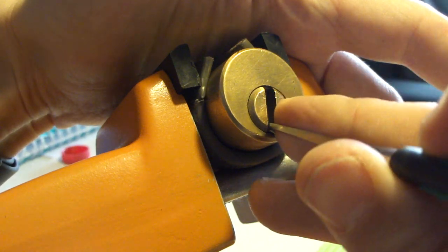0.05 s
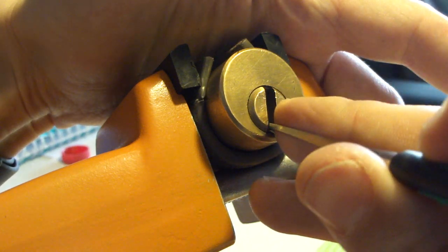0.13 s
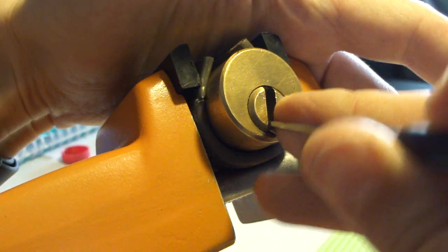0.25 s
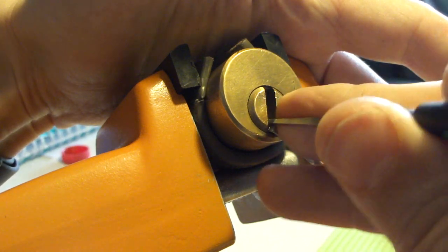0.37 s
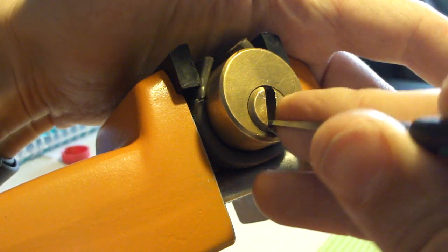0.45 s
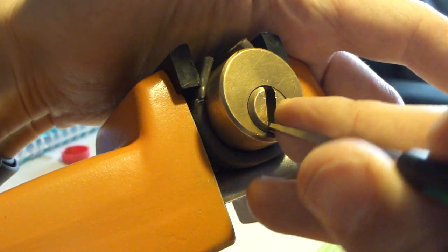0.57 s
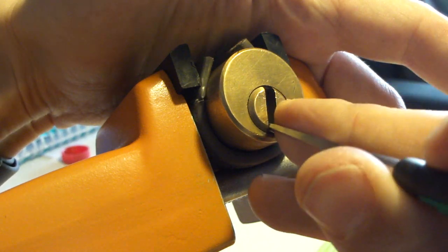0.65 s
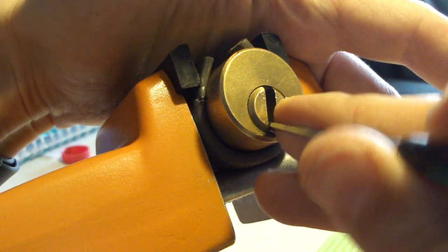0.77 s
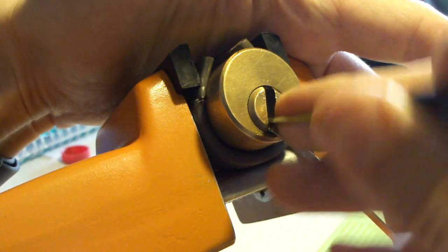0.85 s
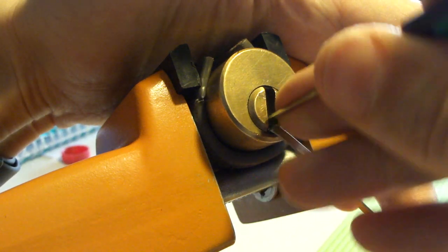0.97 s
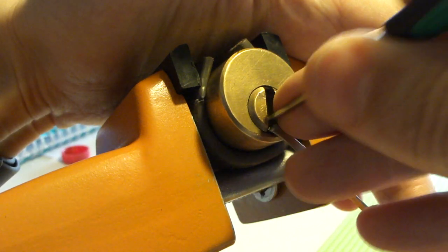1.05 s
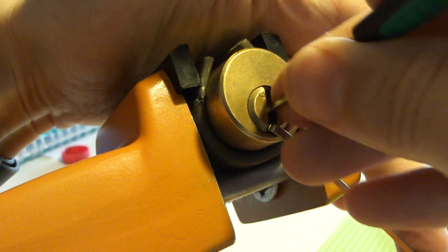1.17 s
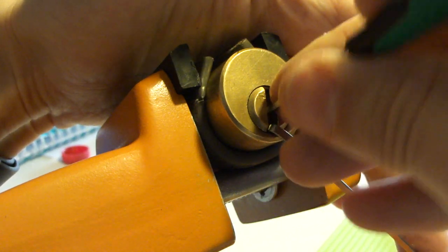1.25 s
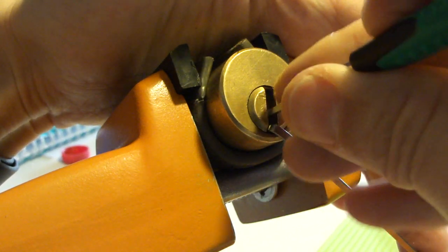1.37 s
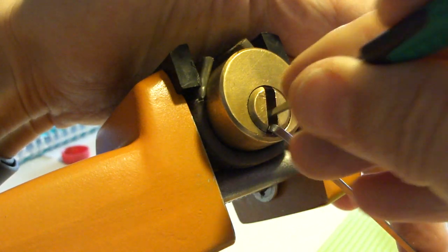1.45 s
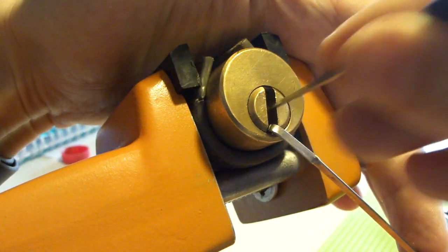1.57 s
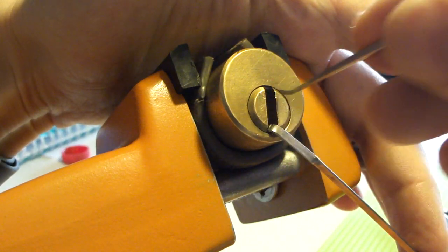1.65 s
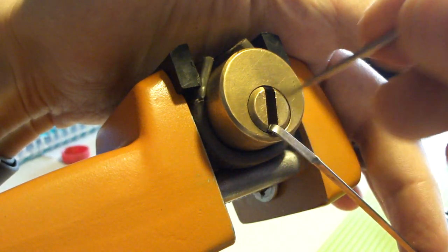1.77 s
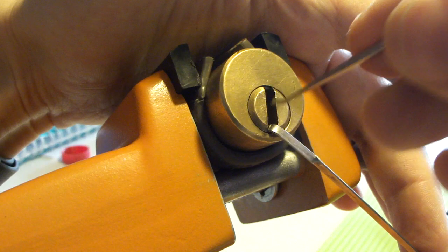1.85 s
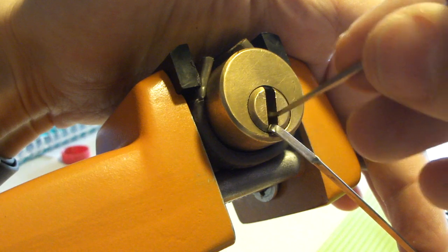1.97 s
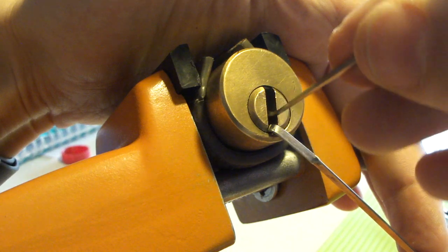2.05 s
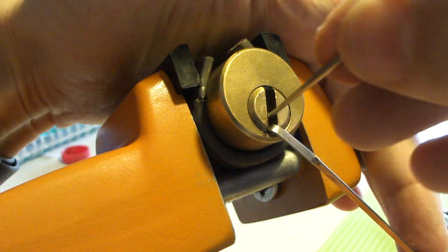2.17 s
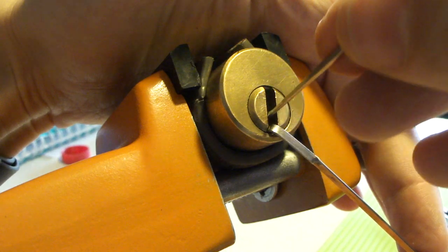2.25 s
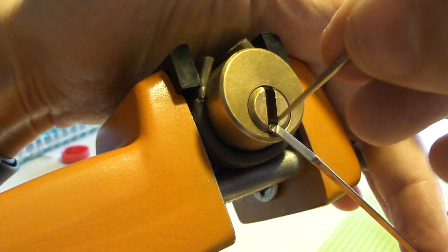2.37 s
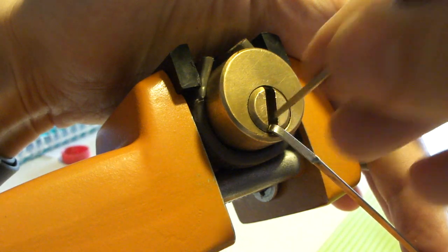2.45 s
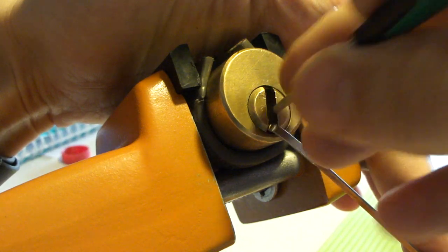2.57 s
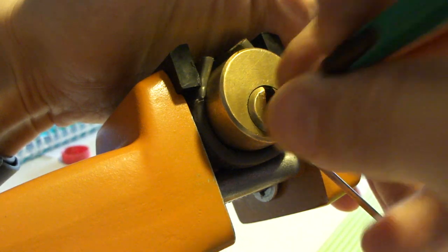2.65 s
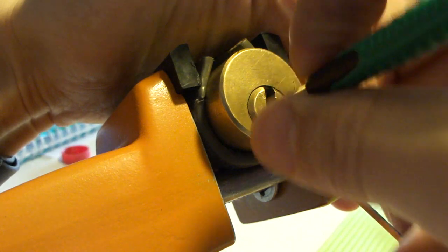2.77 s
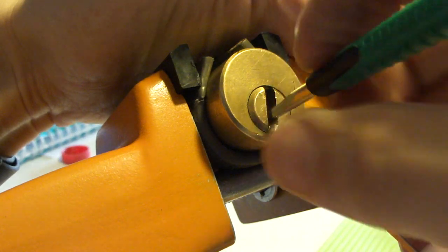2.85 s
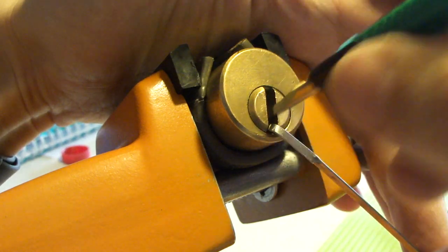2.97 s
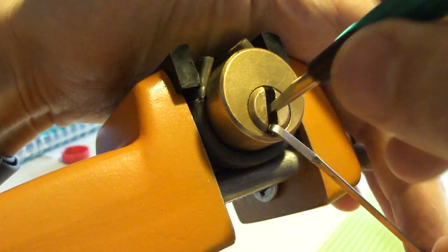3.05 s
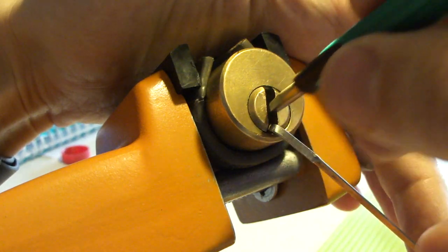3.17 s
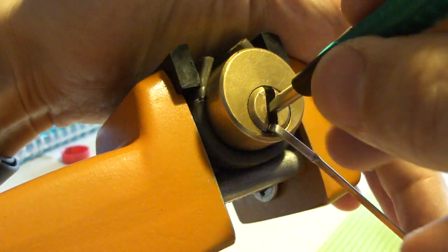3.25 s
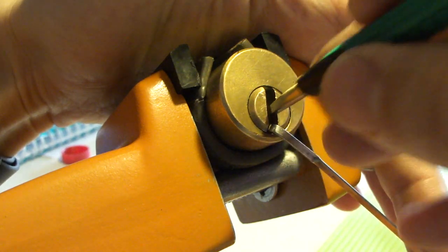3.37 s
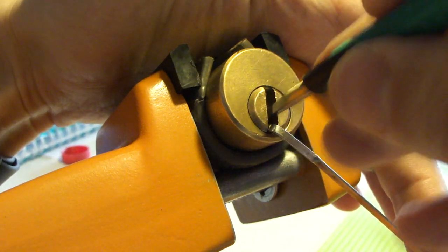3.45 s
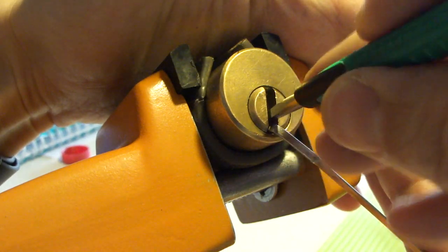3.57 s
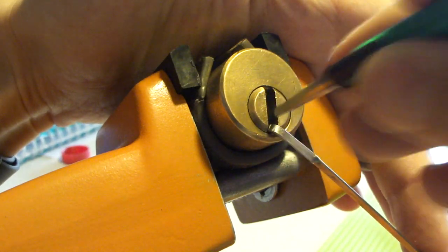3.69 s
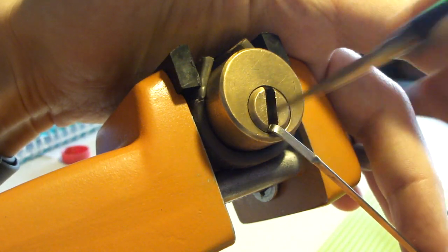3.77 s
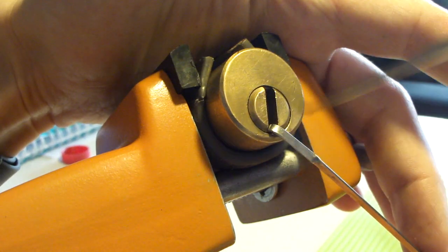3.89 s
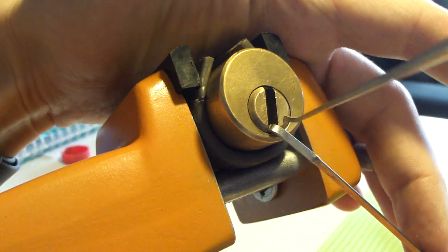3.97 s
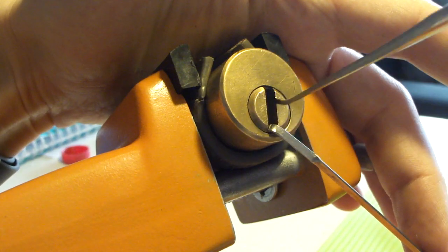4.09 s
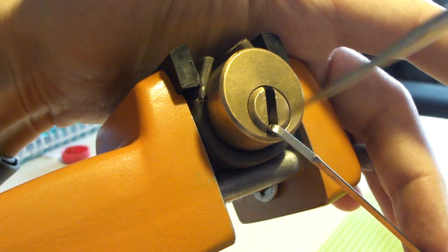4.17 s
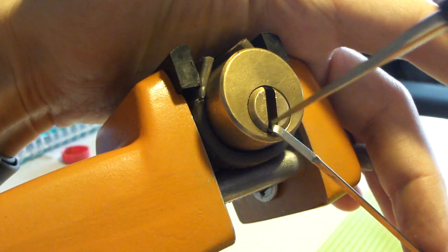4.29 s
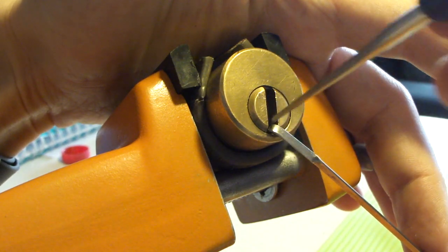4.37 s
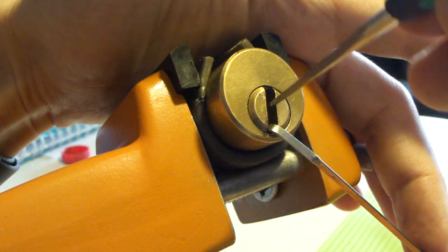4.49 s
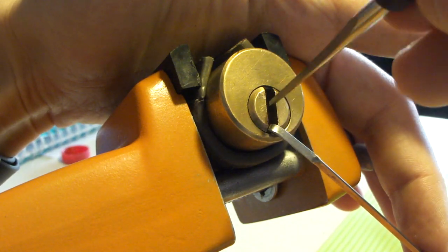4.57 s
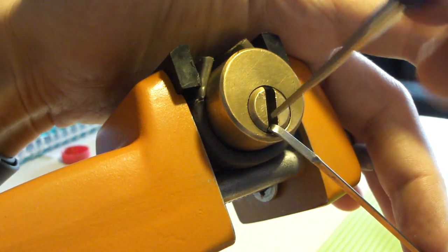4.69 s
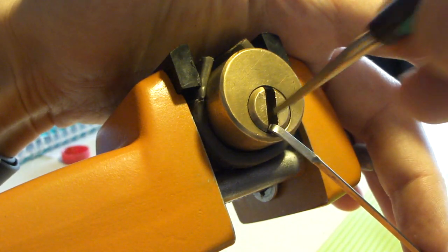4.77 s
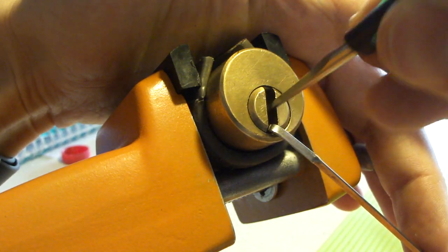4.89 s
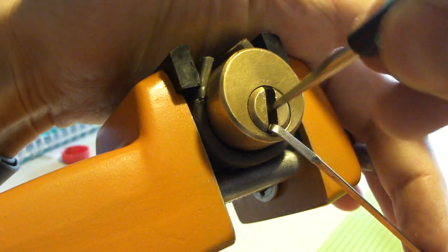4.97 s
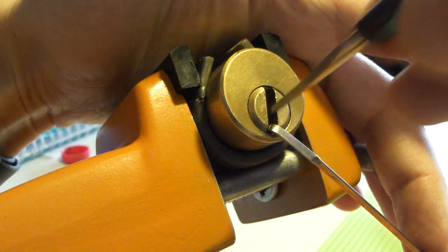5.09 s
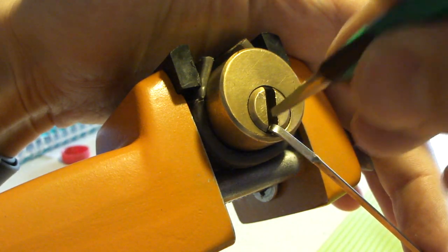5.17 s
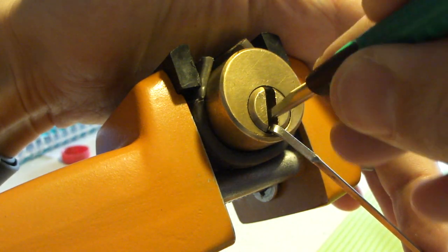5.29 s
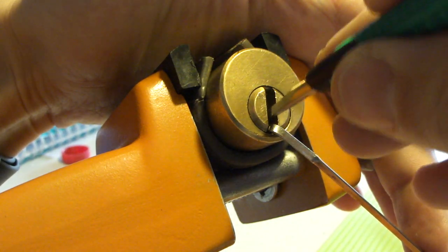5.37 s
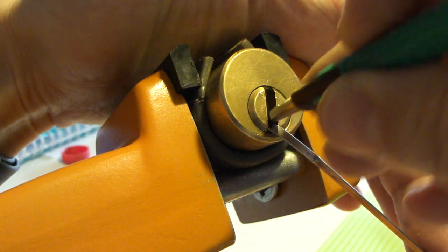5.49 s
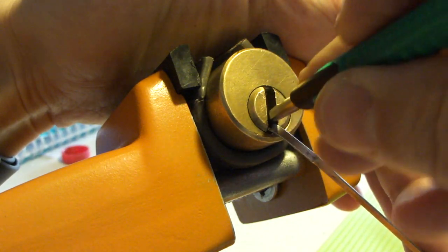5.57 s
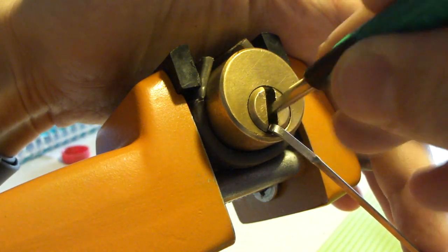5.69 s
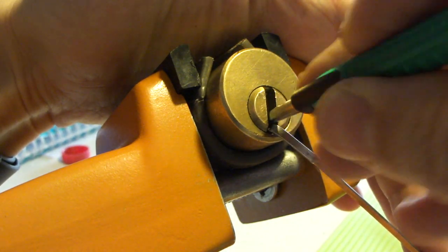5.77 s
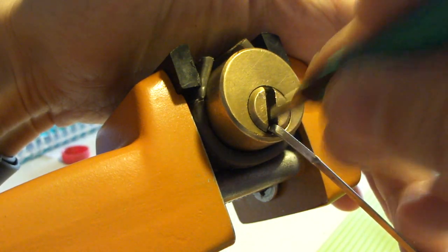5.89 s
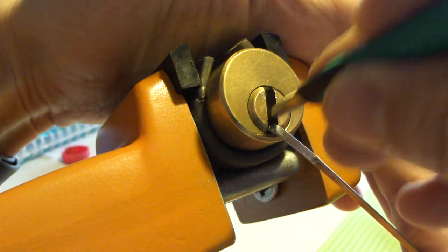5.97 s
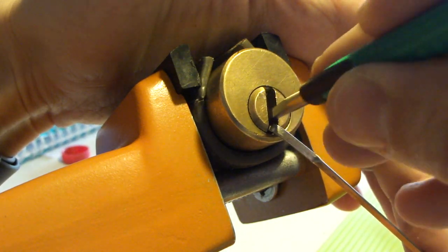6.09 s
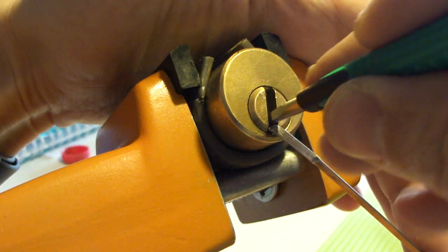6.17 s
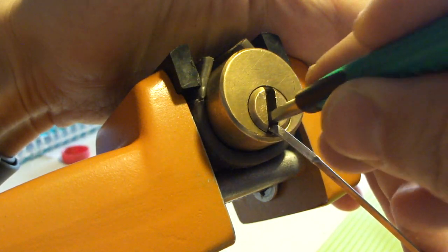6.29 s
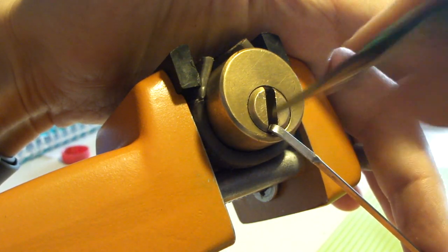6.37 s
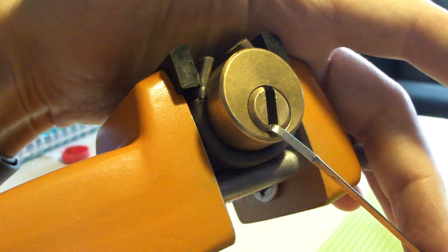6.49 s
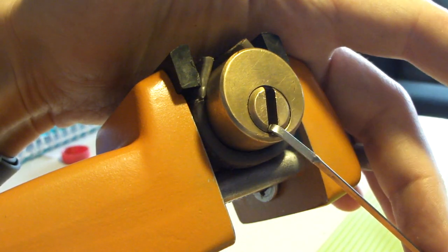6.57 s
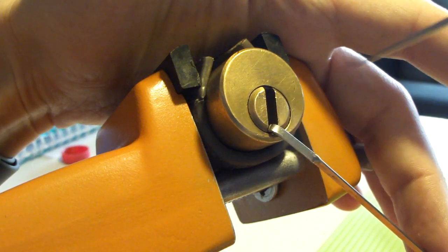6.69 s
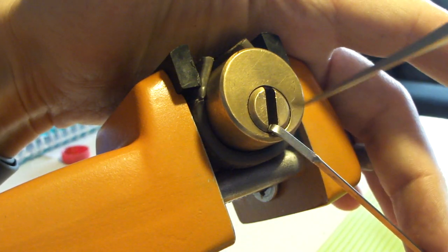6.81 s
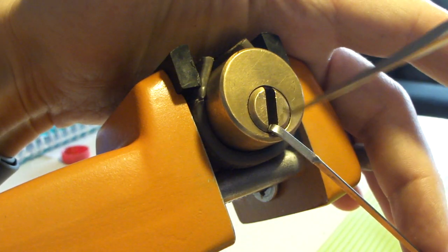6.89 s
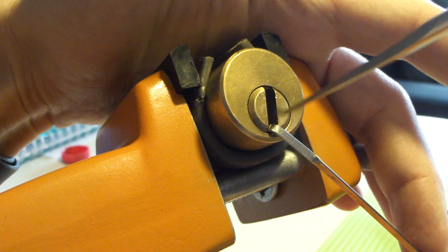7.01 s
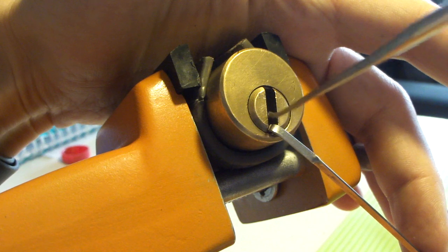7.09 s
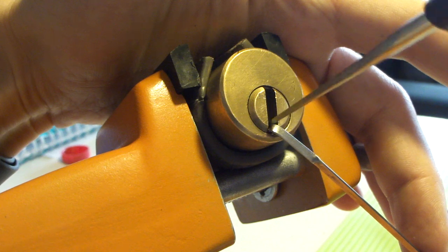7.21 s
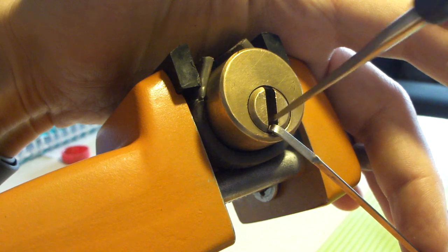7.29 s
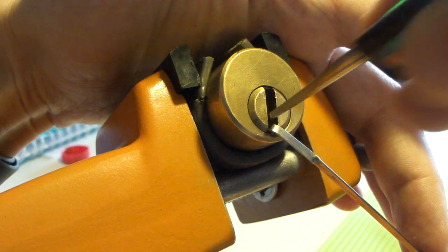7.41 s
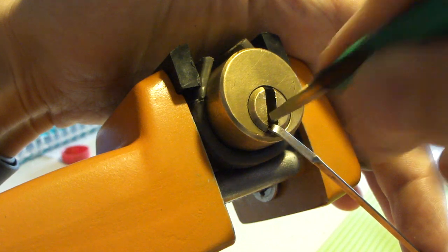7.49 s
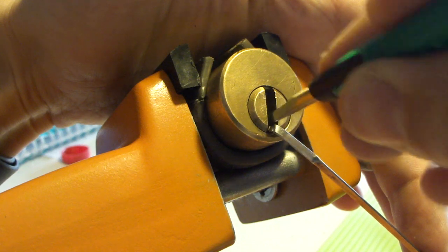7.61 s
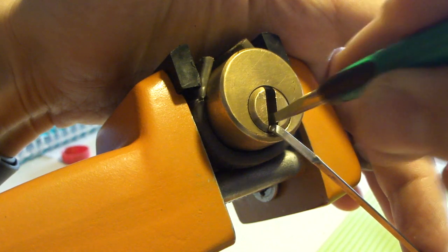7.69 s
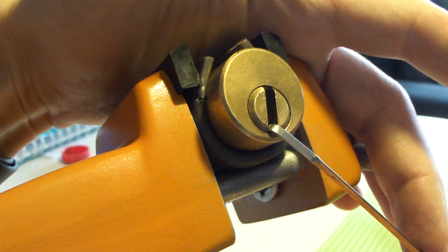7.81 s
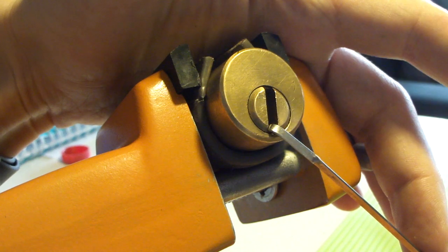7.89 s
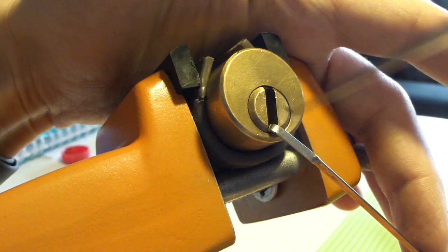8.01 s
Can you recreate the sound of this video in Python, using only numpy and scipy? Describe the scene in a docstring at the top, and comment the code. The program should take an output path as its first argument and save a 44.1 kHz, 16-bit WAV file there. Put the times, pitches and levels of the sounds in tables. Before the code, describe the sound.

A quiet room with faint steady hush, heard through a close stereo microphone. One soft dull knock comes around 0.7 s, then faint ticks and light scrapes from 1 s. At 1.55-1.65 s a tight burst of hard, bright metallic clicks rattles out over a short scrape and knock. Faint touches and weak scrapes follow from 1.9 to 2.8 s, then a crisp double click at 3.0 s. Small ticks lead into a dense, loud chatter at 3.7-3.87 s with brassy pings. From 4.3 to 6.3 s come scattered moderate clicks, brief gritty scrapes and dull knocks, firmer near 4.75, 5.5, 5.8 and 5.95 s. A very sharp, loud cluster snaps at 6.4-6.45 s, then near silence. Light ticks and thin scraping return around 7.0-7.65 s, before a final loud rattle at 7.7-7.82 s dies quickly into hush.

```python
"""Bursts of metallic ticks and bright scraping, with short dull knocks, over a faint room hush.
A steel pick rakes the pins of a brass lock cylinder in a small vice, close to a stereo microphone.
Clicks and chatter ring the pins; sparse grains make the scrape; hard blows ring cylinder and vice.
Shaped noise makes the hush and the room tail. The recorder notches the low treble, widens the
stereo and rolls off bass and top."""
import sys
import numpy as np
from scipy import signal
from scipy.fft import rfft, irfft, next_fast_len
from scipy.io import wavfile

SR = 44100
rng = np.random.default_rng(int(sys.argv[2]) if len(sys.argv) > 2 else 0)


def store_wav(level_fs):
    """Save 16-bit WAV to argv[1]."""
    pcm = np.round(np.clip(np.atleast_2d(level_fs), -1, 1) * 32767)
    wavfile.write(sys.argv[1], SR, pcm.T.astype(np.int16))


N = 355005

# brass cylinder modes: f/Hz, level/dB, t60/s
CYLINDER_MODES = [(1644, 0, 0.024), (1794, -2, 0.036), (1845.7, 0, 0.066), (1966, 1, 0.038),
                  (2356, -3, 0.011)]
# vice modes: f/Hz, level/dB, t60/s
VICE_MODES = [(128.5, -11, 0.3), (200.5, -7.5, 0.11), (265.5, -4, 0.1), (306.7, -4, 0.05), (392, -3, 0.06),
              (484, 4, 0.032), (634.5, 4.5, 0.028), (825, 2.5, 0.026), (1092, 3, 0.021), (1318, 2, 0.015),
              (1680, 5, 0.0088)]
# pin modes: f/Hz, level/dB at the contact pitch, t60/s for a tick
PIN_MODES = [(5790, 0, 0.0019), (6080, -7, 0.013), (6557, -5, 0.0083), (6990, 0.5, 0.0038),
             (7730, 5, 0.0013), (8560, 2.5, 0.0023), (9130, -5, 0.0074), (9720, 2.5, 0.0027),
             (10320, 8.5, 0.0011), (13600, 12, 0.0016)]


def amp(db):
    """dB to gain."""
    return 10 ** (np.asarray(db) / 20)


def rms_one(x):
    """Scale to unit rms."""
    return x / np.sqrt(np.mean(x ** 2) + 1e-20)


def add(track, start_s, sound):
    """Mix a short sound into a track at start_s."""
    i = max(round(start_s * SR), 0)
    track[..., i:i + sound.shape[-1]] += sound[..., :N - i]


def wander(keep):
    """Low-passed noise of unit rms; keep near 1 is slower."""
    return rms_one(signal.lfilter([1], [1, -min(keep, .9999)], rng.standard_normal(N)))


def grains(shape, per_s, spread_db):
    """Sparse clicks of random sign, a few of them much larger."""
    born = rng.random(shape) < per_s / SR
    size = amp(spread_db * np.minimum(rng.exponential(1, shape), 4))
    return born * size * rng.choice([-1, 1], shape)


def ring(force, hz, t60_s):
    """Two-pole resonator: a unit click starts a decaying sine of initial height 1."""
    radius = amp(-60 / (max(t60_s, 1e-3) * SR))
    w = 2 * np.pi * hz / SR
    # the tiny offset keeps the filter state from underflowing
    return signal.lfilter([0, np.sin(w)], [1, -2 * radius * np.cos(w), radius * radius], force + 1e-18)


def body(force, modes):
    """All modes driven by one force, neighbours in opposite sign."""
    return sum((-1) ** k * amp(db) * ring(force, hz, t60_s)
               for k, (hz, db, t60_s) in enumerate(modes))


def crack(force):
    """The bare contact radiates as a change of force: bright, with no bass."""
    return np.diff(force, prepend=0)


def contact_hz(time_s):
    """Brightest pitch of the pins where the pick touches, interpolated over time."""
    # contact track: t/s, f/Hz
    contact = [(1.0, 7960), (1.6, 9040), (1.9, 6900), (2.4, 6800), (2.56, 8600), (2.7, 6960), (3.15, 8200),
               (3.45, 8800), (3.65, 7240), (3.8, 8000), (4.0, 6850), (4.7, 7050), (4.85, 7860), (5.1, 6840),
               (5.49, 8950), (5.72, 7800), (5.95, 8400), (6.2, 7500), (7.2, 7000), (7.8, 7500)]
    return np.interp(time_s, *np.transpose(contact))


def hush():
    """Room murmur and microphone hiss: steady shaped noise, unrelated at the two ports."""
    # relative noise spectrum: f/Hz, level/dB per Hz
    spectrum = np.array([(30, -39), (100, -5), (135, 1), (165, -4.5), (230, 2), (600, -0.5), (1500, -2),
                         (3000, -16), (7500, -16), (10500, -23), (12500, -48)])
    level_db = -54      # rms, ahead of the recorder
    hz = np.maximum(np.arange(N // 2 + 1) * SR / N, 1)
    colour = amp(np.interp(np.log(hz), np.log(spectrum[:, 0]), spectrum[:, 1]))
    noise = irfft(rfft(rng.standard_normal((2, N))) * colour, N)
    return amp(level_db) * rms_one(noise)


def room(x, level_db):
    """Diffuse room tail: decaying noise, different on each side, delayed by 4 ms."""
    t60_s, length_s, delay_s = 0.4, 0.5, 0.004
    t = np.arange(round(length_s * SR)) / SR
    tail = rng.standard_normal((2, len(t))) * amp(-60 * t / t60_s) * (t > delay_s)
    tail /= np.sqrt(np.sum(tail ** 2, axis=1, keepdims=True))
    return amp(level_db) * signal.fftconvolve(x[None], tail, axes=1)[:, :N]


def knocks():
    """A sharp blow, a rough push and a weaker shudder ring cylinder and vice, mode strengths varying."""
    # knocks: t/s, cylinder peak level/dB, vice peak level/dB, strongest vice f/Hz
    events = [(0.7389, -38, -24, 635), (1.3158, -31, -34.5, 520), (1.5445, -23.5, -23.5, 497),
              (1.5812, -26.5, -27.5, 514), (2.0139, -33, -38, 576), (2.2009, -35, -35, 513),
              (3.028, -24, -31.5, 593), (3.039, -28, -39, 500), (3.234, -45, -37.5, 479),
              (3.411, -33, -49, 463), (3.5287, -28.5, -25.5, 605), (3.7131, -22, -33.5, 526),
              (3.745, -20.5, -31.5, 1370), (3.7681, -23, -28.5, 556), (3.8123, -24.5, -27.5, 305),
              (4.004, -32.5, -32, 580), (4.0311, -29, -31, 420), (4.094, -33, -39, 630),
              (4.3351, -38, -66, 840), (4.4636, -26.5, -21, 1470), (4.872, -23, -23.5, 1370),
              (4.9011, -41, -36.5, 256), (5.037, -34, -49, 471), (5.265, -35, -40, 256),
              (5.4928, -27, -23, 623), (5.7855, -20.5, -18.5, 530), (5.9505, -32, -24.5, 490),
              (6.1845, -36.5, -34.5, 630), (6.3175, -34.5, -35.5, 580), (6.4025, -18.5, -28, 290),
              (6.4437, -16.5, -22.5, 466), (6.954, -27.5, -32, 1060), (7.5545, -32, -36.5, 386),
              (7.639, -39.5, -33.5, 470), (7.7143, -22, -30.5, 573), (7.7576, -23.5, -23, 513),
              (7.8032, -21.5, -20, 485)]
    push_tau_s, shudder_tau_s, cylinder_tau_s = 0.0045, 0.047, 0.034
    vice_slope_db_per_octave, mode_spread_db = 5.14, 1.67
    out = np.zeros(N)
    t = np.arange(8800) / SR
    envelope = np.exp(-t / push_tau_s) + 0.35 * np.exp(-t / shudder_tau_s)
    forces = rng.standard_normal((len(events), len(t))) * envelope
    forces[:, 20] += amp(25)      # the sharp blow
    n_cylinder = len(CYLINDER_MODES)
    shake_db = rng.normal(0, mode_spread_db, (len(events), n_cylinder + len(VICE_MODES)))
    for (start_s, cylinder_db, vice_db, peak_hz), force, luck_db in zip(events, forces, shake_db):
        cylinder = [(f, db + u, t60_s)
                    for (f, db, t60_s), u in zip(CYLINDER_MODES, luck_db[:n_cylinder])]
        vice = [(f, db - vice_slope_db_per_octave * abs(np.log2(f / peak_hz)) + u, t60_s)
                for (f, db, t60_s), u in zip(VICE_MODES, luck_db[n_cylinder:])]
        ping = body(force * np.exp(-t / cylinder_tau_s), cylinder)
        thud = body(force, vice)
        ping *= amp(cylinder_db) / np.abs(ping).max()
        thud *= amp(vice_db) / np.abs(thud).max()
        add(out, start_s, ping + thud)
    return out


def stroke_pressure():
    """Each stroke swells, presses hardest in its middle, and fades as the tip lifts."""
    # pick strokes in the keyway: t/s, length/s, mid-stroke level/dB
    strokes = [(1.048, 0.089, -54.5), (1.152, 0.043, -51), (1.253, 0.064, -54.5), (1.487, 0.06, -56.5),
               (1.532, 0.13, -44), (2.426, 0.18, -53.5), (2.591, 0.17, -43), (3.003, 0.088, -49),
               (3.11, 0.11, -50.5), (3.353, 0.022, -53.5), (3.387, 0.08, -49), (3.492, 0.054, -45.5),
               (3.63, 0.063, -48.5), (3.696, 0.16, -35.5), (4.326, 0.024, -46.5), (4.432, 0.043, -44.5),
               (4.665, 0.051, -54), (4.723, 0.066, -48.5), (4.791, 0.099, -43.5), (5.026, 0.092, -49.5),
               (5.114, 0.16, -45.5), (5.454, 0.073, -43), (5.598, 0.048, -46), (5.654, 0.022, -52),
               (5.687, 0.046, -44.5), (5.747, 0.06, -44.5), (5.861, 0.039, -46), (5.916, 0.075, -48),
               (6.006, 0.04, -49.5), (6.06, 0.064, -49.5), (6.155, 0.053, -56), (6.293, 0.031, -54),
               (6.361, 0.06, -42), (6.398, 0.055, -25.5), (7.319, 0.1, -50.5), (7.428, 0.14, -42.5),
               (7.693, 0.045, -42.5), (7.747, 0.08, -27.5)]
    swell_share, lift_tau_s, arch_db = 0.067, 0.0079, 2      # swell time constant / stroke length
    pressure = np.zeros(N)
    for start_s, length_s, db in strokes:
        t = np.arange(round((length_s + 6 * lift_tau_s) * SR)) / SR
        arch = np.sin(np.pi * np.minimum(t / length_s, 1))
        swell = 1 - np.exp(-t / (swell_share * length_s))
        lift = np.exp(-np.maximum(t - length_s, 0) / lift_tau_s)
        add(pressure, start_s, amp(db - arch_db * (1 - arch)) * swell * lift)
    return pressure


def slide():
    """Grains under the pick tip excite the pins near the contact, the cylinder and, weakly, the vice."""
    pin_slope_db_per_octave, pin_t60_factor = 13.0, 2.4
    bright_hz = contact_hz(np.arange(N) / SR)
    force = amp(3.97 * wander(0.956)) * grains(N, 7000, 4.46)      # the tip catches and slips
    slow = 1 - 2 * np.pi * 12 / SR      # 12 Hz: modes fade in and out as the contact point moves
    scrape = np.zeros(N)
    for hz, db, t60_s in PIN_MODES:
        off_contact_db = pin_slope_db_per_octave * abs(np.log2(hz / bright_hz))
        drive = force * amp(db + 3.5 * wander(slow) - off_contact_db)
        scrape += ring(drive, hz, pin_t60_factor * t60_s)
    cylinder = amp(-5.5 + 3.8 * wander(slow)) * rms_one(body(force, CYLINDER_MODES))
    vice = amp(-14.5) * rms_one(body(force, VICE_MODES))
    return stroke_pressure() * (rms_one(scrape + 0.7 * crack(force)) + cylinder + vice)


def ticks():
    """A sharp click amid a brief chatter of grains rings the pin modes near the contact."""
    # pin and pick contacts: t/s of full contact, peak level/dB of the two-side mean
    contacts = [(0.9498, -37.5), (1.1716, -31), (1.317, -29.5), (1.5447, -10), (1.5512, -15), (1.565, -28),
                (1.5777, -7), (1.585, -17), (1.5933, -23), (1.6034, -14), (1.607, -12), (1.6363, -15.5),
                (1.6487, -13), (1.9376, -33.5), (2.004, -40), (2.128, -36.5), (2.1526, -38), (2.203, -43),
                (2.3618, -35.5), (2.38, -33), (2.487, -34.5), (2.524, -35), (2.566, -35.5), (2.595, -29),
                (2.9813, -37.5), (3.019, -15), (3.0265, -16), (3.076, -30.5), (3.401, -24), (3.53, -25.5),
                (3.5506, -34), (3.6476, -27), (3.7077, -11.5), (3.713, -12.5), (3.741, -11.5),
                (3.7668, -4.5), (3.7815, -14), (3.8147, -5), (3.8214, -12.5), (3.8263, -7), (3.8376, -15),
                (3.8537, -12), (3.8616, -8), (4.0025, -34.5), (4.0328, -30), (4.089, -42.5),
                (4.1423, -42.5), (4.3164, -28.5), (4.4333, -23), (4.4651, -26.5), (4.529, -35.5),
                (4.664, -30.5), (4.7358, -19.5), (4.8127, -27.5), (4.8709, -23.5), (5.0594, -29),
                (5.166, -26.5), (5.4096, -34), (5.4938, -18.5), (5.555, -39), (5.641, -51), (5.7859, -23.5),
                (5.81, -38), (5.951, -15.5), (6.1835, -26), (6.2226, -22.5), (6.3168, -31), (6.3953, -5.5),
                (6.4076, -7.5), (6.4188, -3), (6.4366, -12), (6.4426, -6.5), (6.4471, -5), (6.954, -34),
                (7.104, -45.5), (7.2096, -26.5), (7.384, -30), (7.421, -31), (7.551, -33), (7.638, -31.5),
                (7.66, -31), (7.7122, -11.5), (7.758, -9.5), (7.7739, -4.5), (7.782, -16), (7.8006, -2.5),
                (7.8067, -8), (7.8126, -5), (7.8217, -4)]
    chatter_t60_s, chatter_gaps = 0.023, 1.7      # t60 at most 1.7 gaps to the next contact
    pin_slope_db_per_octave, before = 16.0, 260      # samples ahead of full contact
    out = np.zeros((2, N))
    t = np.arange(-before, 1700) / SR
    chatter = grains((len(contacts), len(t)), 6500, 3.4)
    chatter[:, before] = amp(9.5)      # the moment of full contact
    shake_db = rng.normal(0, 5.1, (len(contacts), len(PIN_MODES)))
    pans_db = rng.normal(-1.5, 4.0, (len(contacts), len(PIN_MODES)))      # each mode beams its own way
    gaps_s = np.diff(np.array(contacts)[:, 0], append=N / SR)
    t60s = np.minimum(chatter_t60_s, chatter_gaps * gaps_s)
    for (peak_s, db), t60_s, grain, luck_db, pan_db in zip(contacts, t60s, chatter, shake_db, pans_db):
        force = grain * amp(-60 * np.where(t > 0, t, -2.4 * t) / t60_s)      # swells faster than it dies
        shared = 0.15 * crack(force) + amp(-29.5) * body(force, CYLINDER_MODES)
        bright_hz = contact_hz(peak_s)
        sides = []
        for sign in (1, -1):
            pins = [(f, level - pin_slope_db_per_octave * abs(np.log2(f / bright_hz)) + u + sign * p / 2, d)
                    for (f, level, d), u, p in zip(PIN_MODES, luck_db, pan_db)]
            sides.append(shared + body(force, pins))
        sound = np.array(sides)
        add(out, peak_s + t[0], amp(db) * sound / np.abs(sound.mean(axis=0)).max())
    return out


def scene():
    """The lock sits to one side, so the left port hears it later; knocks fill the room more."""
    left_lag_s, room_db, knock_room_db = 2.6e-5, -20.5, -11
    bright = ticks() + slide()
    dull = knocks()
    size = next_fast_len(N + 64)
    hz = np.arange(size // 2 + 1) * SR / size
    lag = np.exp(-2j * np.pi * hz * np.array([[left_lag_s], [0]]))
    direct = irfft(rfft(bright + dull, size) * lag, size)[:, :N]
    return direct + room(bright.mean(axis=0), room_db) + room(dull, knock_room_db) + hush()


def record(dry):
    """Recorder: raised side signal, low-treble notches, bass and top roll-off, soft clip, top cut."""
    # recorder cuts: f/Hz, width/Hz of one pass
    notches = [(3020, 320), (4000, 887), (5020, 555)]
    widen_db, low_cut_hz, roll_off_hz, cutoff_hz = 0.5, 136, 11000, 16000
    mid = (dry[0] + dry[1]) / 2
    side = amp(widen_db) * (dry[0] - dry[1]) / 2
    x = np.array([mid + side, mid - side])
    for hz, width_hz in notches * 2:      # two passes, for a broad deep floor
        x = signal.lfilter(*signal.iirnotch(hz, hz / width_hz, fs=SR), x)
    x = signal.sosfilt(signal.butter(2, low_cut_hz, "high", fs=SR, output="sos"), x)
    x = signal.sosfilt(signal.butter(10, roll_off_hz, fs=SR, output="sos"), x)
    x = np.tanh(x)      # the loudest clicks are rounded
    return signal.sosfilt(signal.cheby2(12, 70, cutoff_hz, fs=SR, output="sos"), x)


dry = scene()
out = record(dry)
store_wav(out)
```